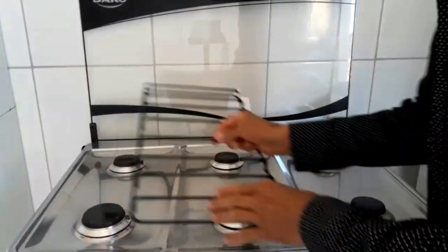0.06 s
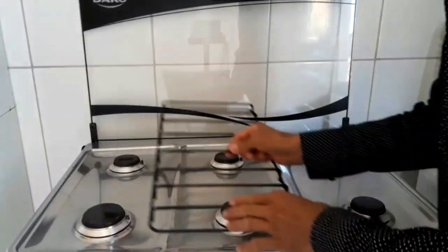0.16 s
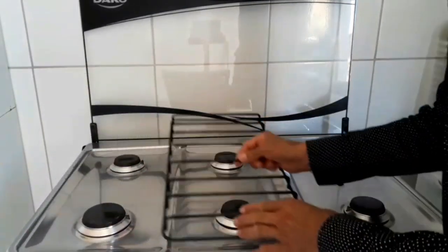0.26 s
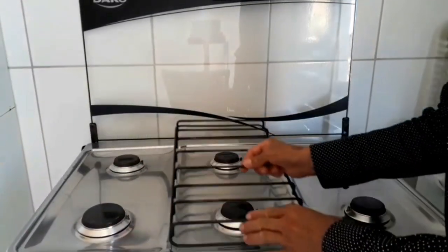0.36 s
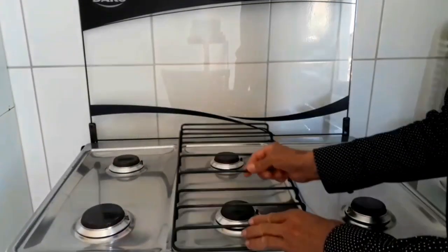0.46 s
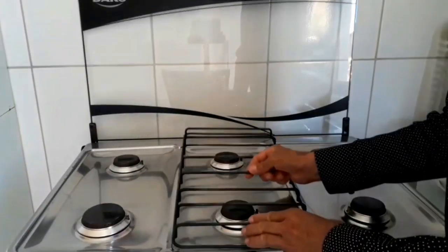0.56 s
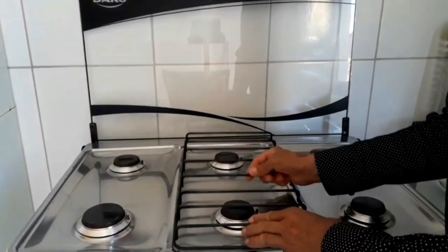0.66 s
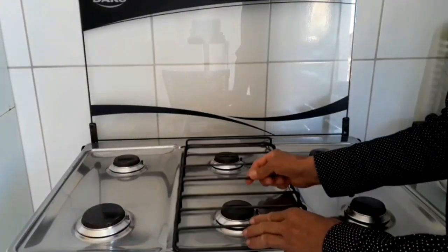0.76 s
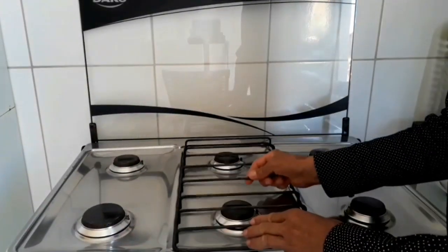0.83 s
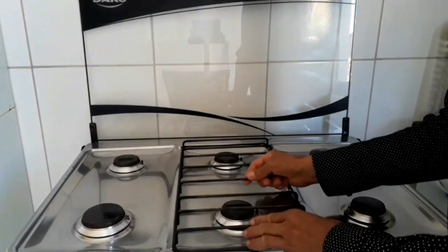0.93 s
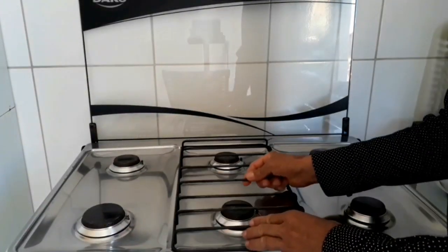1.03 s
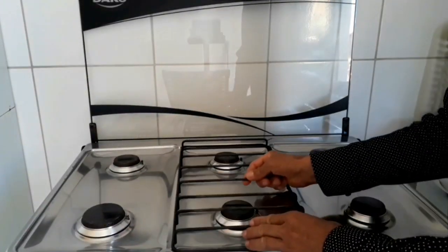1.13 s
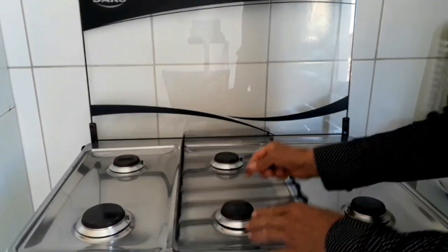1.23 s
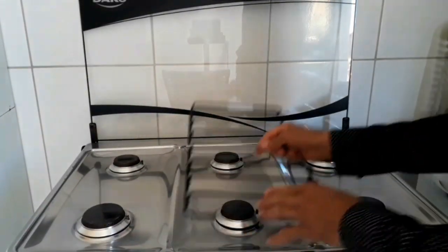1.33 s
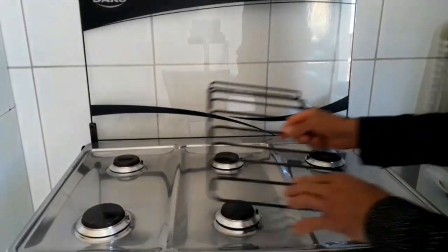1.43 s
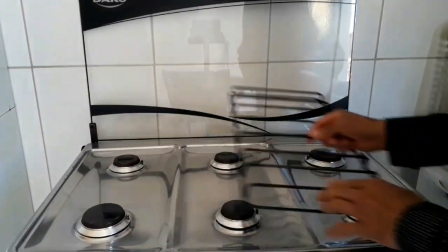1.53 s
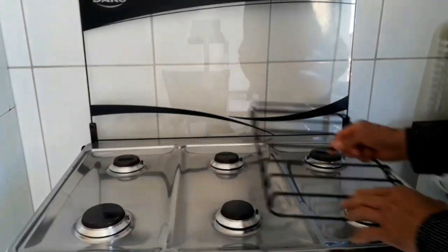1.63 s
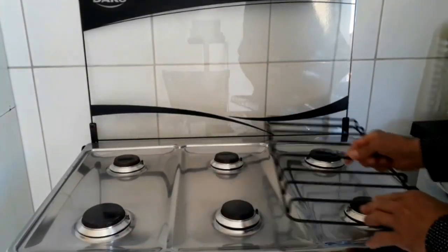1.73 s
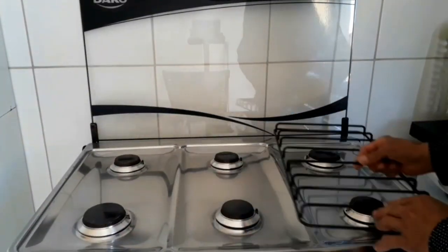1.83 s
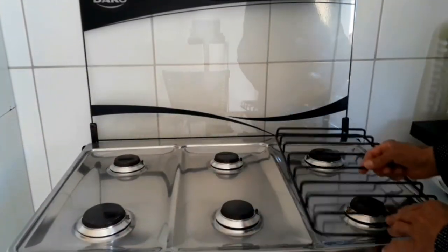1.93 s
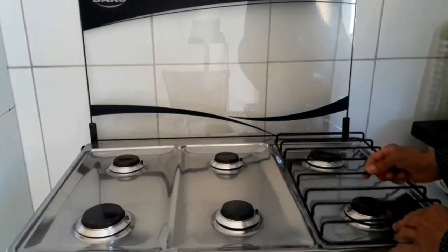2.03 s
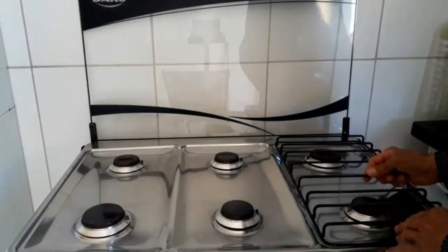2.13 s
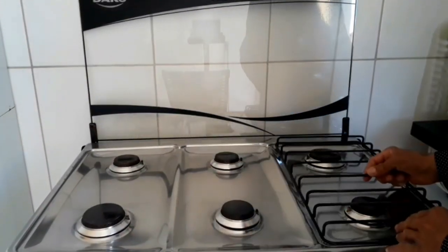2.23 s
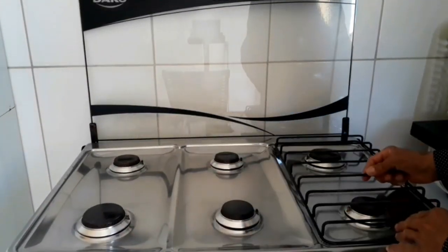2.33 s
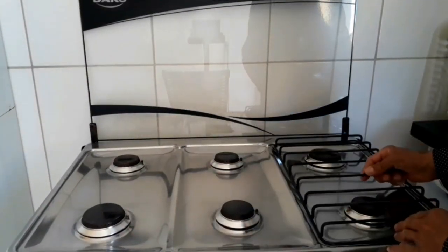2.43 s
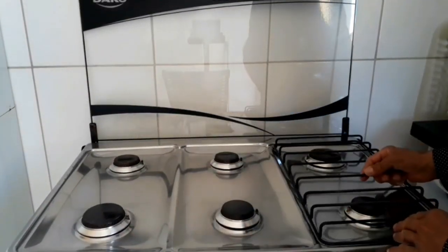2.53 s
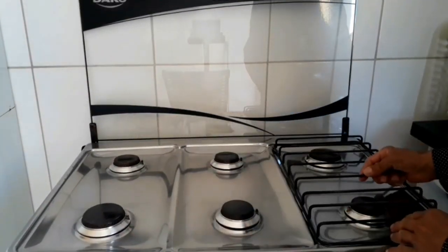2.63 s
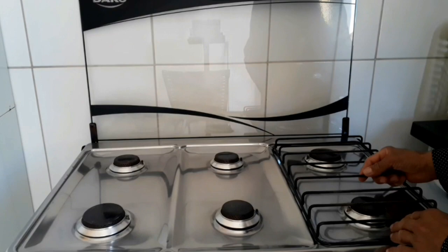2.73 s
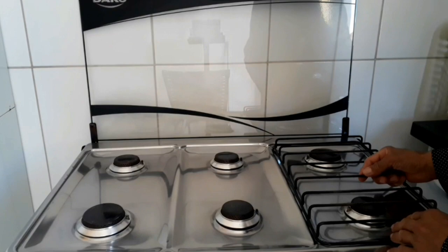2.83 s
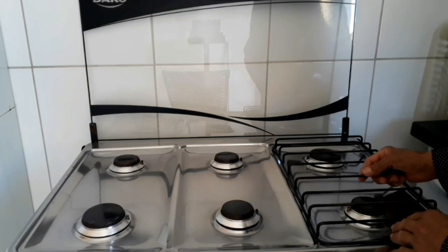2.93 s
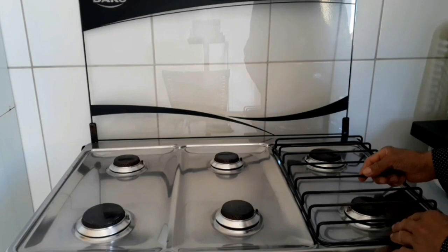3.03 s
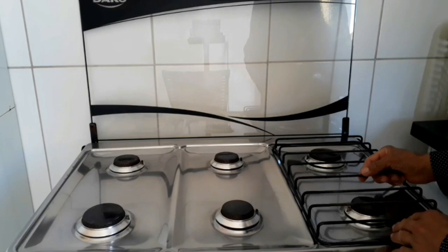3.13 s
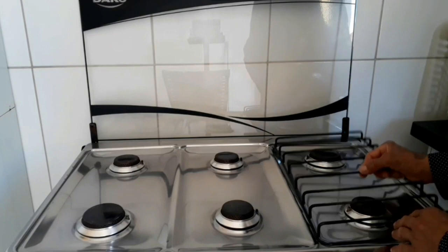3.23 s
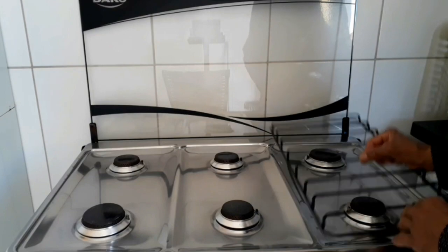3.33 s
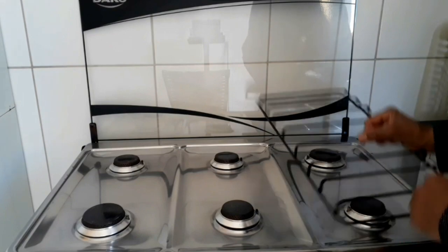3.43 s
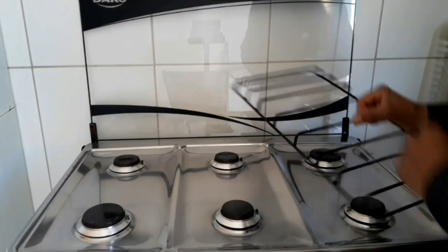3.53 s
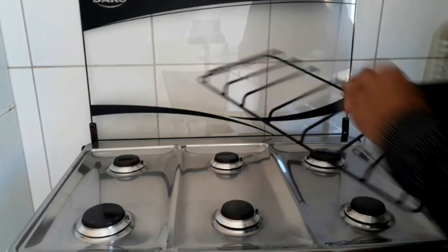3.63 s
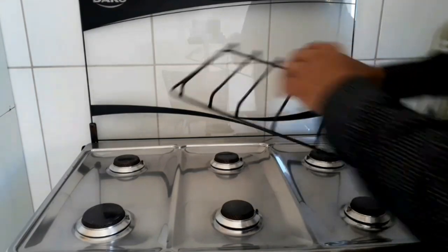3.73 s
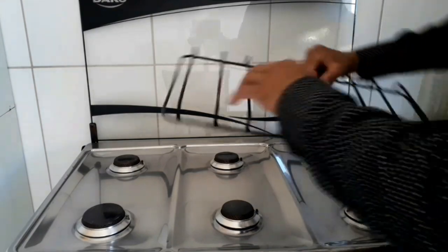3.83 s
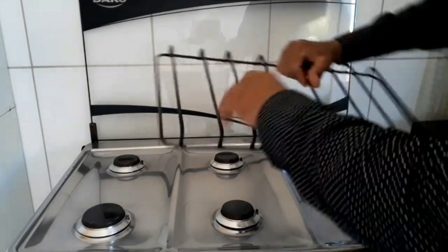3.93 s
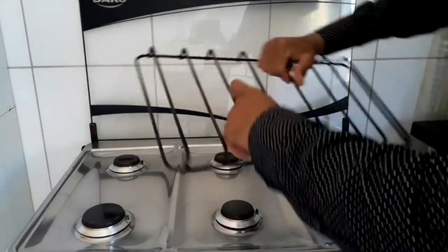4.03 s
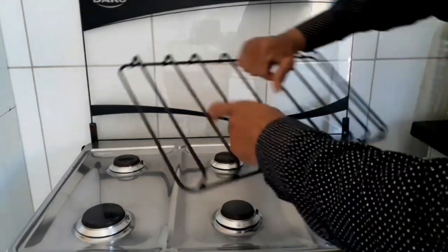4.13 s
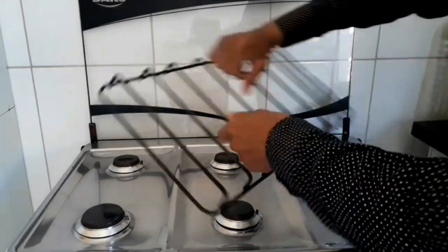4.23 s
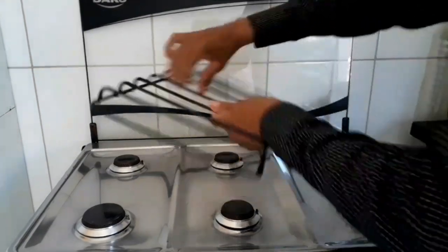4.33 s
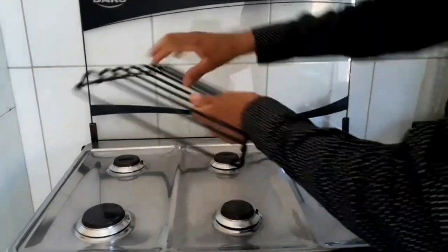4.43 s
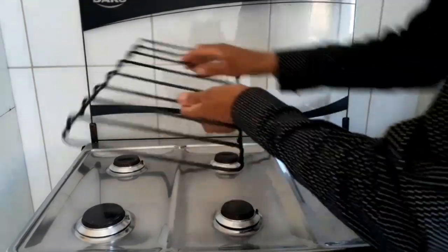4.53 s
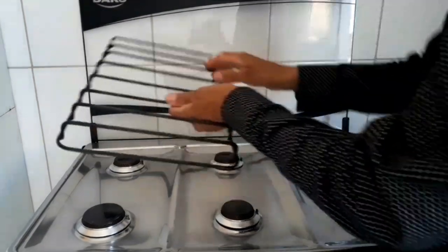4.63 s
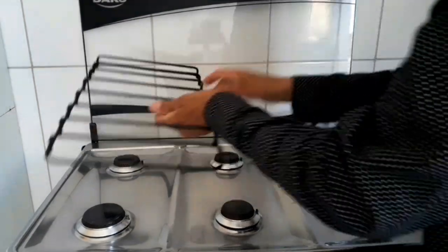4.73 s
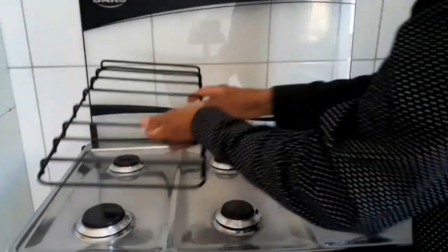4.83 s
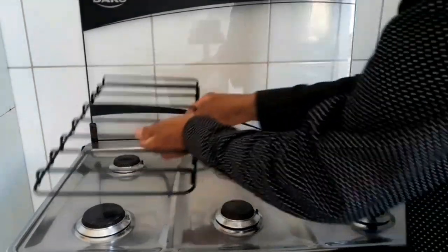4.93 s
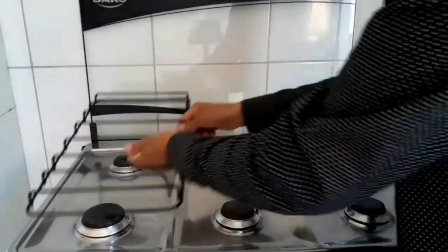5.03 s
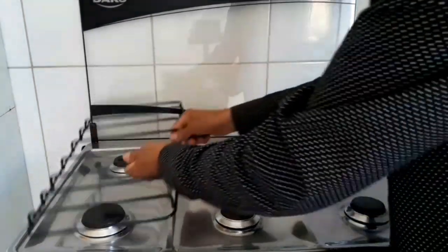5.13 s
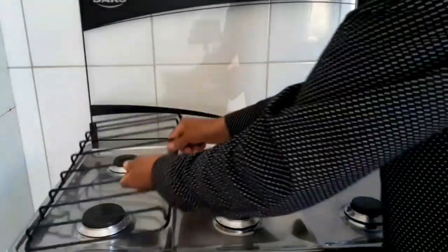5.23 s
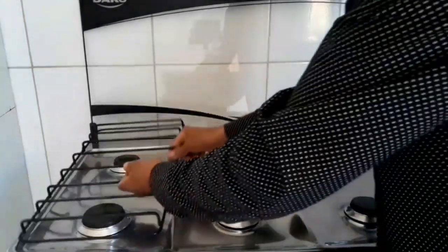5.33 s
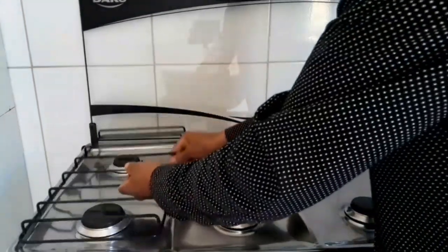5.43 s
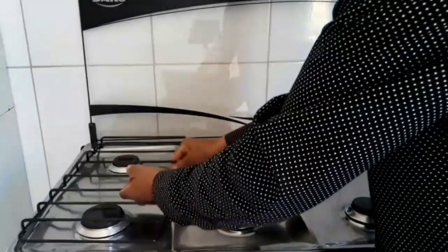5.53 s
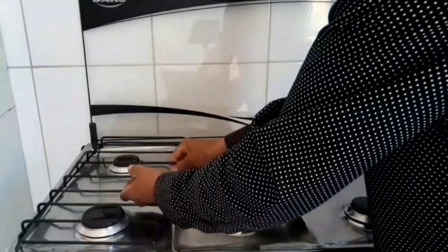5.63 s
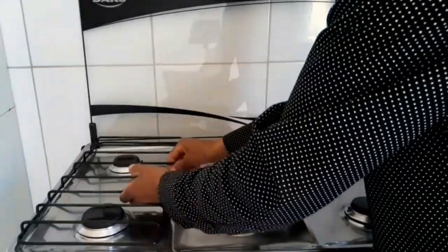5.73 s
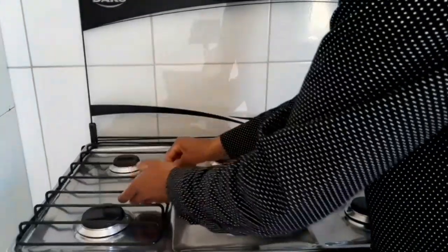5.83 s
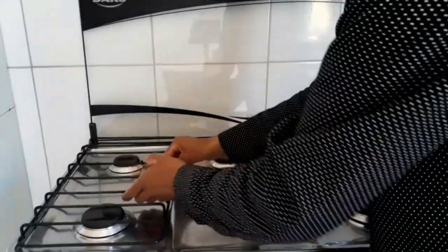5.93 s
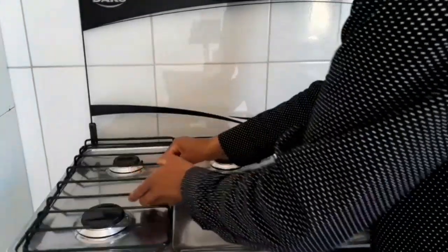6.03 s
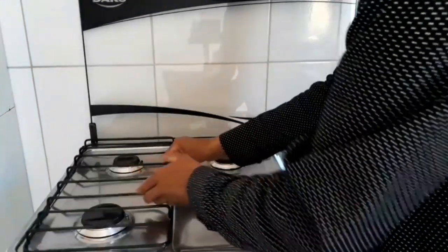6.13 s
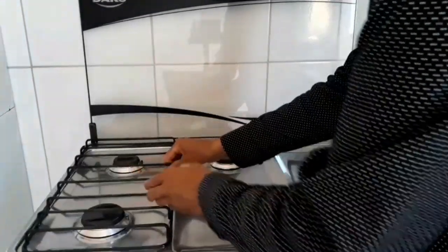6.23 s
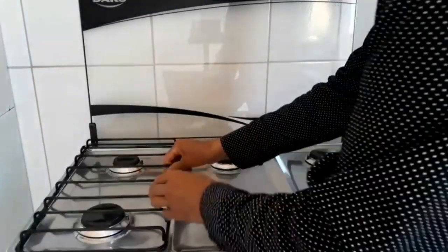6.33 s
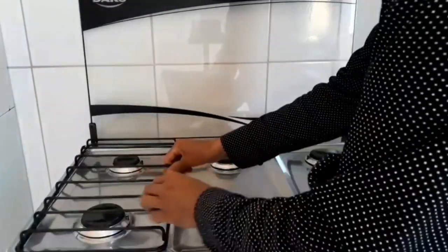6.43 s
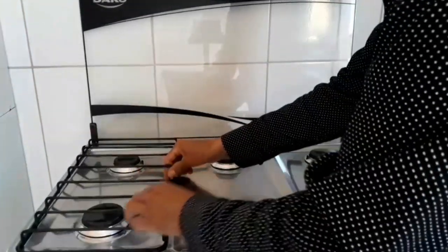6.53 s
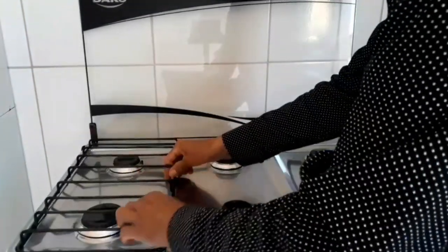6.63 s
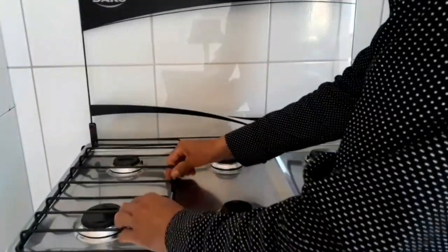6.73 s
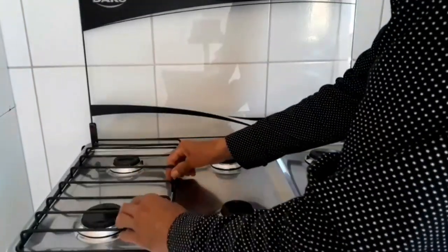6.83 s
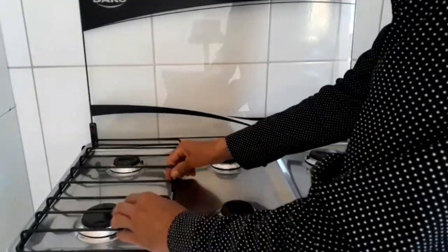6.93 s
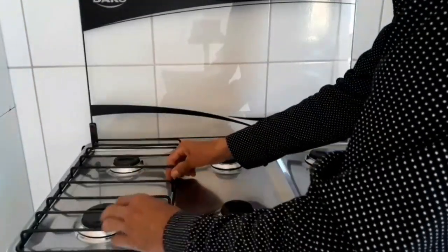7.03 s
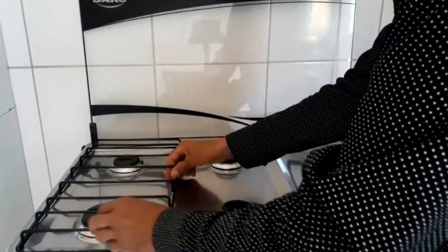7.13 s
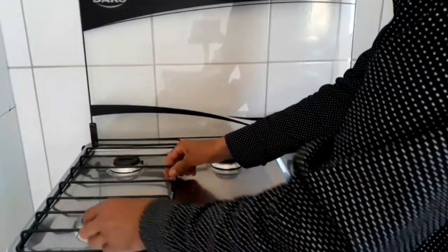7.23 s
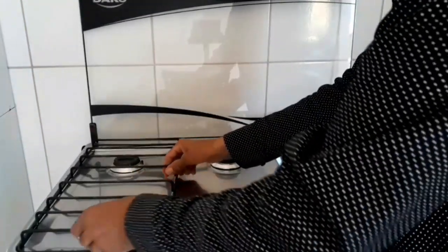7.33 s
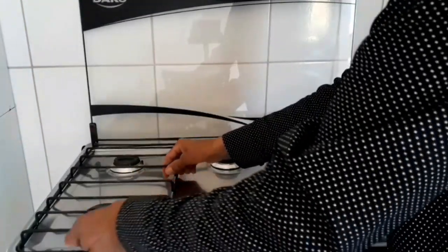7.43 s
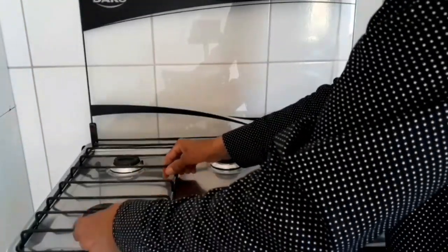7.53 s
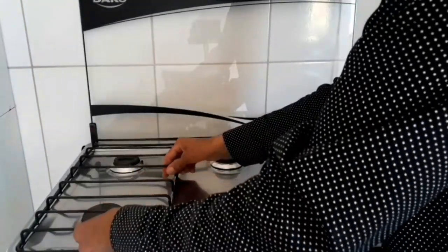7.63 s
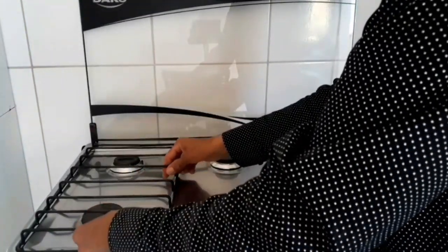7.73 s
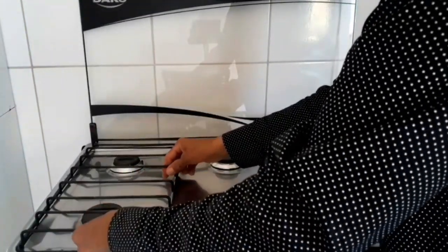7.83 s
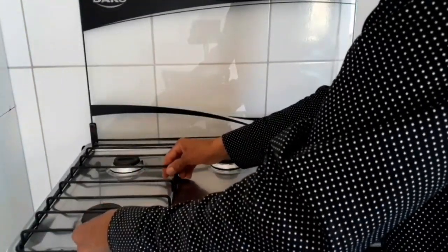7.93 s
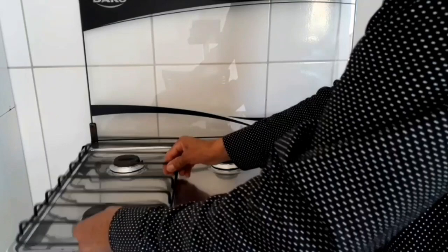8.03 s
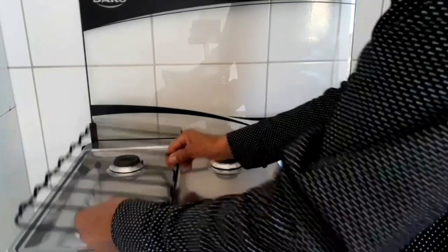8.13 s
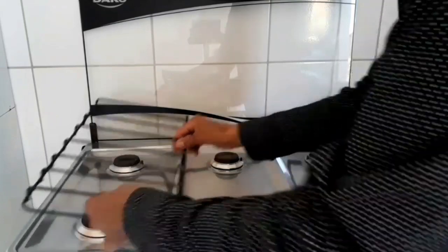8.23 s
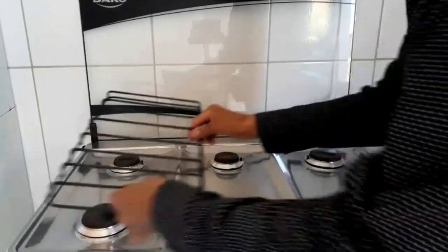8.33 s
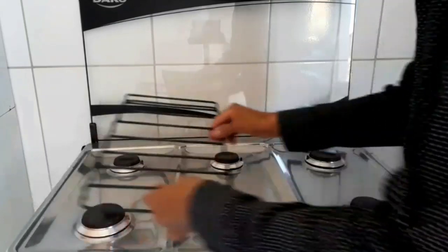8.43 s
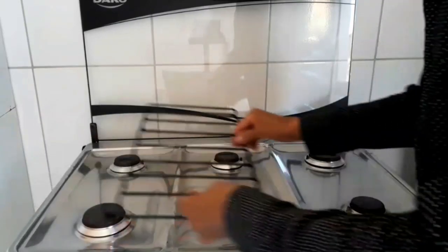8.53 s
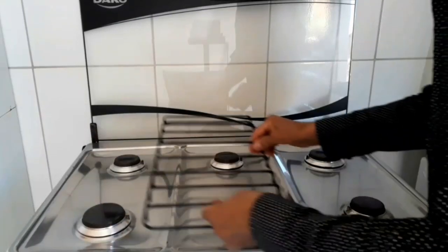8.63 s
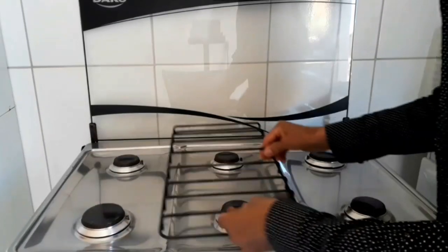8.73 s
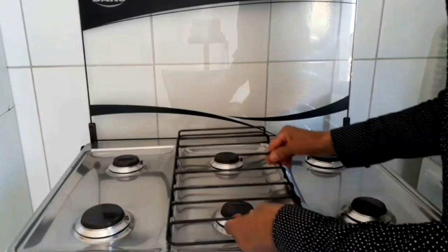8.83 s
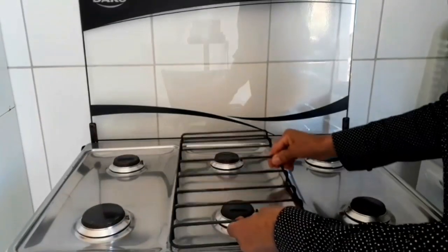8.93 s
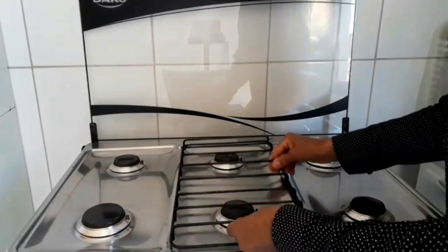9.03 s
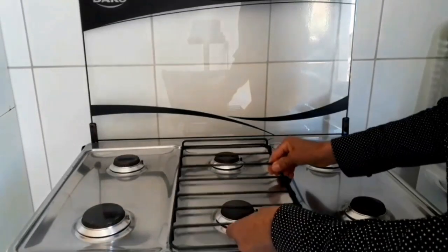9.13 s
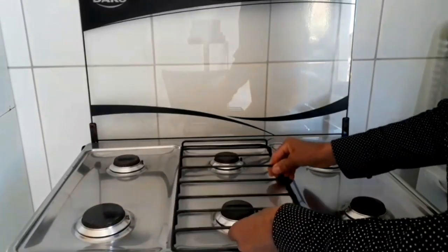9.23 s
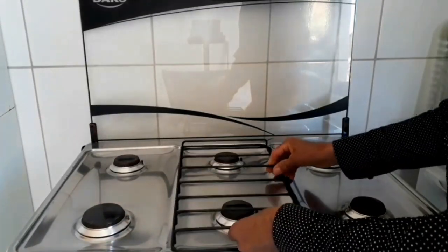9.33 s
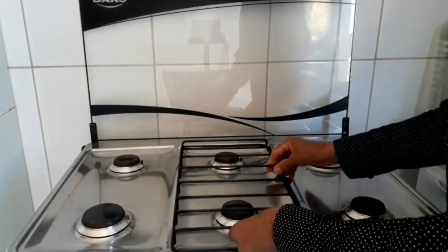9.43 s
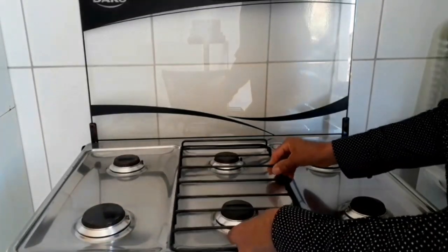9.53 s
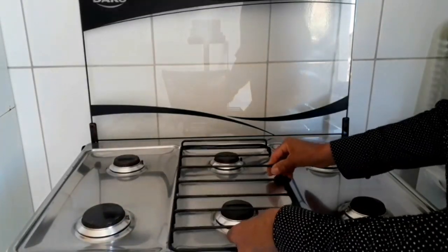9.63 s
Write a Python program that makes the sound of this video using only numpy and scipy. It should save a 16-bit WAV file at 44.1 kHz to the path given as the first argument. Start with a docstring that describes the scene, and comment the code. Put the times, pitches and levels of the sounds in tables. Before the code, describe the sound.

Wire grates are set onto a hollow steel stove top in a tiled kitchen: a hard double clank at once, a lighter clink at two seconds, a quiet gap, then a louder run of clatters from five to six seconds and a final cluster after nine. Sleeves rub faintly, a distant engine revs low, and soft hiss and hum lie behind. Close, nearly mono microphone.

```python
"""Wire grates clank onto a steel stove top: middle (corner first), right, left, then middle again.
Each contact is a chattering force through grate resonances, sheet modes and echoes of a tiled kitchen.
Decaying sines add the boom of the stove's box and the room.
Sleeves and sliding wires rub as shaped noise; a carried grate sings in faint, unsteady sines.
Behind: a far engine of three harmonics that revs twice, room tone with hum, and microphone hiss."""
import sys
import numpy as np
from scipy import signal
from scipy.fft import rfft, irfft, next_fast_len
from scipy.io import wavfile
from scipy.ndimage import map_coordinates

SR = 44100
rng = np.random.default_rng(int(sys.argv[2]) if len(sys.argv) > 2 else 0)


def pcm_store(signal):
    """Save signal as 16-bit PCM."""
    levels = np.round(np.clip(np.atleast_2d(signal), -1, 1) * 32767)
    wavfile.write(sys.argv[1], SR, levels.astype(np.int16).T)


N = 426447

# Contacts of grate and stove: t/s, relative clang level/dB, thud over clang/dB, edge over clang/dB
CONTACTS = [ (.509, -27.5, -6, -12), (.71, -45, 2.5, -11.5), (.816, -24.5, -5, -4.5),
            (.836, -27, -4.5, -6.5), (.905, -41, 1.5, -1.5), (.998, -39.5, 8, -5.5),
            (2.175, -39.5, 1, -4.5), (2.21, -41, 0, -14), (2.246, -29.5, -9.5, -16),
            (2.338, -41.5, 3.5, -9.5), (2.456, -57, 7.5, -3), (2.664, -55, 5.5, -16), (2.69, -52, -2, -31),
            (3.214, -61, 6, -7), (5.323, -33, 2.5, -5), (5.517, -29.5, -4, -3.5), (5.586, -27, 3, -1),
            (5.649, -25.5, -3, -4), (6.032, -52, 12, 3.5), (6.059, -23, -2.5, -6.5), (6.081, -20, -7.5, -6),
            (6.135, -34.5, 3, -5), (6.325, -41, 5.5, -.5), (6.366, -29, 0, -9), (7.226, -58.5, -3, -8),
            (7.241, -43, -4.5, -5), (7.305, -51.5, 10.5, -15), (7.629, -54, 5.5, -24),
            (7.89, -43, 3.5, -14.5), (7.952, -44, -9, -8.5), (9.136, -27, -2, -1.5),
            (9.247, -31, -5.5, -3.5), (9.287, -29.5, 2.5, -3), (9.604, -39, -9, -3.5),
            (9.627, -29, -5, -29)]
# Resonances of each grate lying on the sheet: f/Hz, width/Hz, relative level/dB
MIDDLE = [(565, 7, -4.5), (646, 34, -1), (797, 34, 0.5), (905, 11, -7), (942, 32, -16.5), (1040, 27, 4.5),
          (1265, 130, 1.5), (1520, 13, -2), (1830, 21, 0.5), (2207, 100, -0.5), (3140, 200, -5.5),
          (4160, 79, -7.5), (6000, 64, -35), (6700, 37, -18), (7360, 41, -15), (8540, 78, -9.5),
          (8930, 190, -19)]
RIGHT = [(485, 8.7, 6.5), (1020, 60, -5), (1250, 33, -12), (1458, 11, 6.5), (2140, 140, 0), (2660, 25, 0),
         (2990, 180, -2.5), (4040, 350, -6.5), (4840, 24, -21)]
LEFT = [(794, 21, -0.5), (980, 17, 0.5), (1090, 20, -4), (1280, 50, -4.5), (1490, 46, 0.5),
        (1750, 30, -6.5), (1880, 62, -3.5), (2100, 14, -3.5), (2190, 18, -8), (2700, 120, -5.5),
        (3130, 280, -11), (3470, 75, -13.5), (4280, 97, -22), (4570, 61, -15), (6100, 60, -14),
        (6850, 220, -18.5), (8400, 110, -14)]
# The middle grate touching on its first corner, a different set: f/Hz, width/Hz, relative level/dB
CORNER = [(505, 41, 6), (700, 40, 1), (821, 40, 12), (902, 32, 1.5), (1030, 40, 4.5), (1223, 58, 10.5),
          (1770, 27, 8), (1950, 60, 4.5), (2330, 70, -6.5), (2840, 120, -7.5), (3000, 80, -7.5),
          (4330, 140, -10.5), (7060, 120, -6.5), (8700, 300, -8.5)]
# Grates in turn; the right one fizzes least, the last set-down booms most:
# start t/s, resonances, boom/dB, ring/dB, fizz/dB
TURNS = [(0, CORNER, 1.5, -0.5, 0), (0.78, MIDDLE, -1.5, 0, 1), (2, RIGHT, -2, 1.6, -7),
         (5, LEFT, -1.5, .5, -2.5), (9, MIDDLE, 3.5, -0.2, -0.5)]
# Crowded modes of the steel top: f/Hz, relative density/dB per Hz
SHEET_MODES = [(80, -27), (150, -13.5), (200, 4), (250, -14), (285, -0.5), (350, 0), (450, -2.5), (570, -8),
               (1330, -5), (1660, -11.5), (2190, -7.5), (5200, -21.5), (8950, -23.5), (9500, -25.5),
               (15800, -31.5)]
# Low modes of the stove's box and the room: f/Hz, relative level/dB, t60/s
BOX_MODES = [(91.6, -7, 0.88), (100.6, -14, 1.5), (178, -23, 0.38), (203.3, -10.5, 0.42),
             (225.8, -11.5, 1.6), (277.3, -9, 0.84), (350.4, -9, 0.55), (444.5, -13.5, 1)]
# Decay of the kitchen's echoes: f/Hz, t60/s
KITCHEN_DECAY = [(90, 2.1), (220, 0.92), (560, 1.087), (1500, 0.98), (3900, 0.83), (8000, 0.66),
                 (14000, 0.43)]
# Strokes of sleeves and sliding wires: t/s, relative level/dB, swell/s
STROKES = [(.14, -76.5, 0.024), (2.67, -51, 0.017), (4.18, -71, 0.22), (4.64, -70.5, 0.12),
           (5.12, -68, 0.11), (6.72, -56, 0.038), (7.72, -63, 0.039)]
# Colour of the rubbing: f/Hz, relative density/dB per Hz
RUSTLE_SPECTRUM = [(800, -10), (2000, 1.5), (4000, -4.5), (6500, -6.5), (8700, 0.5), (9600, -10),
                   (11500, -6.5), (13000, -8), (16000, -9.5)]
# Notes of the carried grate as fingers slide on its wires: t/s, f/Hz, level before waver/dB, swell/s
SINGING_NOTES = [(4.3, 4010, -78, .04), (3.97, 5610, -77, .05), (4.18, 550, -71, .17),
                 (4.15, 2654, -76, .19), (4.22, 10220, -76, .03)]
# Revs of the distant engine: peak t/s, second-harmonic level/dB, rise/s, fall/s
REVS = [(.33, -49.5, .13, .1), (5.09, -49.5, .3, 0.18)]
# Colour of the room tone: f/Hz, relative density/dB per Hz
AIR_SPECTRUM = [(15, -51), (25, -3), (48, -13), (170, -12), (216, -5), (261, -14), (500, -14.5),
                (572, -21.5), (620, -16), (834, -19), (2030, -24.5), (2200, -27), (2390, -27), (15800, -43)]
# Colour of each microphone's self-noise: f/Hz, relative density/dB per Hz
HISS_SPECTRUM = [(60, -12.5), (250, -6), (1000, -7.5), (3000, -9), (5000, -11.5), (8000, -17), (11000, -10),
                 (16000, -8.5)]

RING_PER_EDGE_DB = 0.38  # dB of ring per dB of edge: a sharper contact is brighter all the way up
CHATTER_T60_S, CHATTER_POWER = 0.15, 0.29  # rebound t60 at 0 dB; grows as this power of blow strength
HANDLING_DB = -84  # rustle that never stops, relative as STROKES
IDLE_HZ, CLIMB_HZ = 51.2, 2.3  # firing rate at rest; a rev swings about 0.9 of CLIMB_HZ each way
AIR_START_DB, AIR_FADE_DB_PER_S = -60.5, 0.48
TOP_HZ = 15650  # recorder's band limit


def amp(db):
    """Amplitude factor from dB."""
    return 10 ** (np.asarray(db) / 20)


def unit(x):
    """Scale to rms 1."""
    return x / np.sqrt(np.mean(x ** 2) + 1e-20)


def along(points, hz):
    """Interpolate (f/Hz, value) points on a log frequency axis."""
    f, value = np.transpose(points)
    return np.interp(np.log(hz + 1), np.log(f + 1), value)


def wobble(rate_hz):
    """Smooth random curve with rate_hz knots a second."""
    knots = rng.standard_normal(int(N * rate_hz / SR) + 4)
    return map_coordinates(knots, [np.arange(N) * rate_hz / SR])


def swelling(t, peak_s, swell_s):
    """Gaussian swell, swell_s its standard deviation."""
    return np.exp(-0.5 * ((t - peak_s) / swell_s) ** 2)


def filtered(x, response):
    """Apply a response of frequency through a zero-padded FFT."""
    size = next_fast_len(N + SR // 2)
    spectrum = rfft(x, size) * response(np.fft.rfftfreq(size, 1 / SR))
    return irfft(spectrum, size)[..., :N]


def noise(spectrum):
    """Coloured noise of rms 1."""
    white = rng.standard_normal(N)
    return unit(filtered(white, lambda hz: amp(along(spectrum, hz))))


def clanks(sheet_db, grate_db, strike_db, floor_db, size=65536):
    """Contacts drive sheet and grate; hard ones chatter longer, the landing spot sets thud and edge."""
    t, hz = np.arange(size) / SR, np.fft.rfftfreq(size, 1 / SR)
    bands_hz = [(150, 550), (650, 1600), (1900, 4200), (5000, 15000)]  # thud, clang, ring, edge
    floor = amp(floor_db) ** 2 / (1 + (hz / 200) ** 4) * hz ** 2 / (hz ** 2 + 60 ** 2)
    sheet_power = amp(sheet_db + along(SHEET_MODES, hz)) ** 2 + floor
    out = np.zeros(N + size)
    for s, db, thud_db, edge_db in CONTACTS:
        grate, _, ring_db, fizz_db = grate_in_hand(s)
        grate_power = amp(grate_db) ** 2 * resonance_power(grate, hz) / (1 + (hz / 9000) ** 4)
        body = np.sqrt(sheet_power + grate_power)
        body = body * amp(along([(8000, 0), (12500, fizz_db)], hz))
        echoes = kitchen(t, early_db=-7, early_t60_s=0.19, build_s=0.0013)
        chatter_t60_s = CHATTER_T60_S * amp(db) ** CHATTER_POWER
        force = chatter(t, chatter_t60_s, rate_hz=1500, bounce_db=-3.5)
        blow = rfft(force) * rfft(echoes)
        # Offset each band's target by the energy it already holds
        held = [np.linalg.norm((body * blow)[(hz > lo) & (hz < hi)]) / size for lo, hi in bands_hz]
        target_db = np.array([thud_db, 0, ring_db + RING_PER_EDGE_DB * edge_db, edge_db])
        share_db = target_db - 20 * np.log10(held)
        share = amp(along(list(zip([350, 1100, 2800, 6500], share_db)), hz))
        clank = irfft(blow * causal(body * share))
        out[round(s * SR):][:size] += amp(db + strike_db) * clank
    return out[:N]


def grate_in_hand(s):
    """Resonances and boom, ring and fizz levels of the grate handled at time s."""
    return [turn for start_s, *turn in TURNS if start_s <= s][-1]


def chatter(t, t60_s, rate_hz, bounce_db):
    """Contact force: a first blow, then tiny rebounds of the wire feet that die away."""
    hits = rng.standard_normal(len(t)) * (rng.random(len(t)) < rate_hz / SR)
    rebounds = hits * amp(-60 * t / max(t60_s, 0.005))
    force = amp(bounce_db) * rebounds / (np.linalg.norm(rebounds) + 1e-9)
    force[0] += 1
    return force / np.linalg.norm(force)


def resonance_power(modes, hz):
    """Summed power response of the resonances."""
    return sum(amp(db) ** 2 / (1 + ((hz * hz - fc * fc) / (width * (hz + 1))) ** 2)
               for fc, width, db in modes)


def causal(gain):
    """Minimum-phase response of this gain: it rings only after it is struck."""
    cepstrum = irfft(np.log(np.maximum(gain, 1e-6)))
    cepstrum[1:] *= 2
    cepstrum[len(cepstrum) // 2:] = 0
    return np.exp(rfft(cepstrum))


def kitchen(t, early_db, early_t60_s, build_s):
    """Echoes of energy 1: a flurry builds up between near tiles, then a tail whose treble dies first."""
    hz, s, cells = signal.stft(rng.standard_normal(len(t)), SR, nperseg=256)
    decay = amp(-60 * s / along(KITCHEN_DECAY, hz)[:, None])
    tail = signal.istft(cells * decay, SR, nperseg=256)[1][:len(t)]
    flurry = 1 + amp(early_db - 60 * t / early_t60_s)  # gain on the tail
    echoes = tail * flurry * (1 - np.exp(-t / build_s))
    return echoes / np.linalg.norm(echoes)


def boom(box_db, swell_cycles, scatter_db, deep_hz):
    """Thuds set off low modes; the deepest swell slowest and depend most on where the grate lands."""
    t = np.arange(2 * SR) / SR
    hz, mode_db, t60_s = np.transpose(BOX_MODES)[:, :, None]
    envelope = amp(mode_db - 60 * t / t60_s) * (1 - np.exp(-t * hz / swell_cycles))
    modes = envelope * np.exp(2j * np.pi * hz * t)
    depth = (deep_hz / hz[:, 0]) ** 2
    out = np.zeros(N + len(t))
    for s, db, thud_db, _ in CONTACTS:
        _, boom_db, *_ = grate_in_hand(s)
        strength = amp(boom_db * depth + scatter_db * rng.standard_normal(len(BOX_MODES)))
        drive = strength * np.exp(2j * np.pi * rng.random(len(BOX_MODES)))  # random phases
        out[round(s * SR):][:len(t)] += amp(db + thud_db + box_db) * (drive @ modes).real
    return out[:N]


def rubbing(uneven_db):
    """Sleeves and sliding wires hiss in small uneven strokes, softened by the room."""
    t = np.arange(N) / SR
    effort = amp(HANDLING_DB) + sum(amp(db) * swelling(t, s, swell_s) for s, db, swell_s in STROKES)
    strokes = effort * amp(uneven_db * wobble(40)) * noise(RUSTLE_SPECTRUM)
    echoes = kitchen(np.arange(SR) / SR, early_db=2.0, early_t60_s=0.1, build_s=0.002)
    return signal.fftconvolve(strokes, echoes)[:N]


def singing(waver_db, wander):
    """Faint wire notes, unsteady in phase and level, swell and fade while the grate is in the air."""
    t = np.arange(N) / SR

    def note(hz):
        phase = 2 * np.pi * hz * t + 2 * wobble(wander * np.sqrt(hz))
        return np.sin(phase) * amp(waver_db * wobble(30))

    return sum(amp(db) * swelling(t, s, swell_s) * note(hz) for s, hz, db, swell_s in SINGING_NOTES)


def engine(first_db, second_db, third_db, load_db, waver_db):
    """Lowest harmonics through the walls; a rev climbs from below idle to above, the second booms."""
    t = np.arange(N) / SR
    hz, load, second = IDLE_HZ, 0, amp(second_db)
    for s, db, rise_s, fall_s in REVS:
        u = (t - s) / np.where(t < s, rise_s, fall_s)
        effort = np.exp(-0.5 * (u / 3) ** 2)
        hz = hz + CLIMB_HZ * u / 2 * effort
        load = load + effort
        second = second + amp(db) / (1 + u * u) ** 1.5
    phase = 2 * np.pi * np.cumsum(hz * (1 + 0.002 * wobble(22))) / SR
    tone = amp(first_db + load_db * load) * np.sin(phase)
    tone = tone + second * np.sin(2 * phase) + amp(third_db) * np.sin(3 * phase)
    return np.sqrt(2) * tone * amp(waver_db * wobble(9.2))


def room_tone(hum_hz, hum_peak_db):
    """Quiet air, slowly fading, as coloured noise plus a steady low hum."""
    t = np.arange(N) / SR
    hum = amp(hum_peak_db) * np.sin(2 * np.pi * hum_hz * t)
    return hum + amp(AIR_START_DB - AIR_FADE_DB_PER_S * t) * noise(AIR_SPECTRUM)


def microphone_hiss(rms_db):
    """Self-noise, independent in each of the two microphones."""
    return amp(rms_db) * np.array([noise(HISS_SPECTRUM), noise(HISS_SPECTRUM)])


def scene():
    """The kitchen reaches both channels alike; only the hiss differs."""
    stove = clanks(sheet_db=4, grate_db=1.0, strike_db=-14.5, floor_db=-18)
    stove = stove + boom(box_db=1.5, swell_cycles=5.8, scatter_db=1.3, deep_hz=93)
    hands = rubbing(uneven_db=5.0) + singing(waver_db=7.5, wander=1.2)
    background = engine(first_db=-75.0, second_db=-75.5, third_db=-73.5, load_db=9.5, waver_db=1.7)
    background = background + room_tone(hum_hz=60, hum_peak_db=-70.5)
    return stove + hands + background + microphone_hiss(rms_db=-73.5)


def record(dry, low_cut_hz=48):
    """The recorder sheds the deepest bass and cuts steeply above its band limit."""
    low_cut = signal.butter(4, low_cut_hz, "highpass", fs=SR, output="sos")
    return filtered(signal.sosfilt(low_cut, dry), lambda hz: 1 / np.sqrt(1 + (hz / TOP_HZ) ** 200))


dry = scene()
out = record(dry)
pcm_store(out)
```